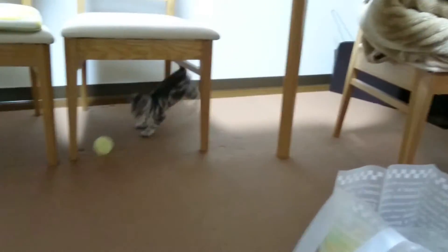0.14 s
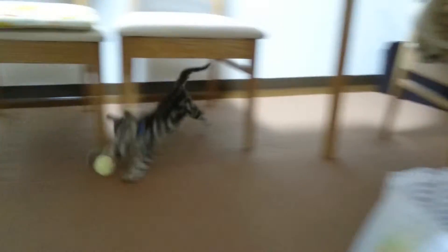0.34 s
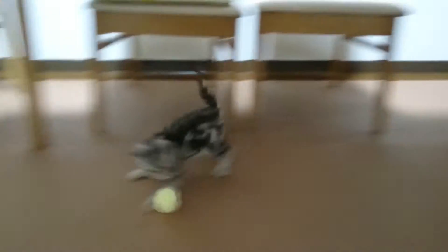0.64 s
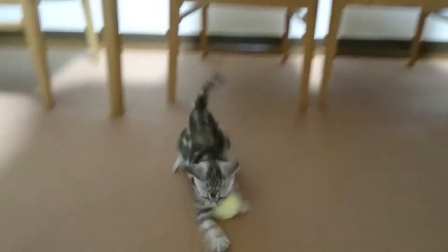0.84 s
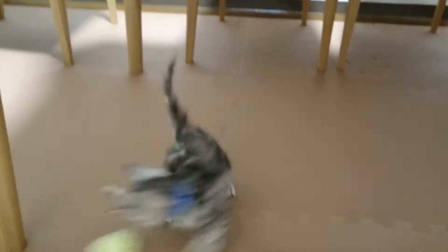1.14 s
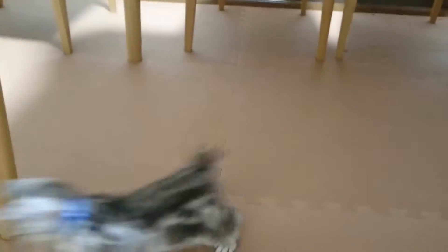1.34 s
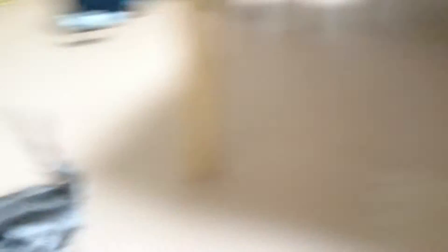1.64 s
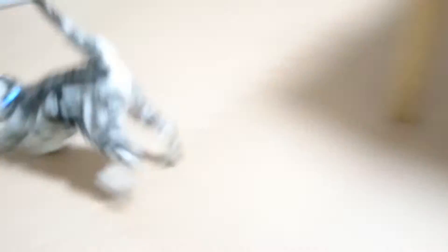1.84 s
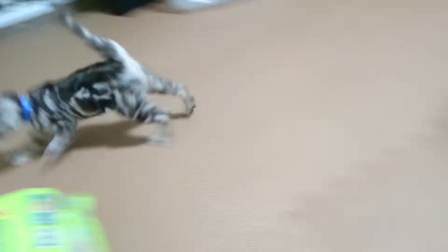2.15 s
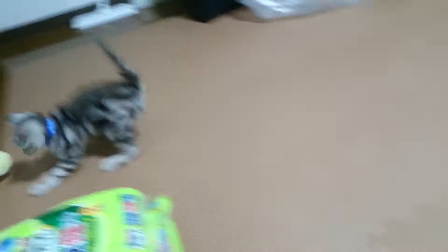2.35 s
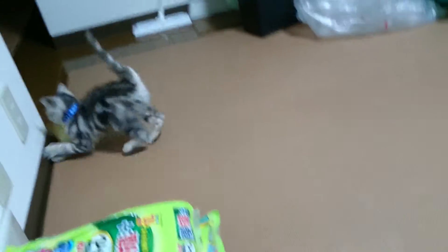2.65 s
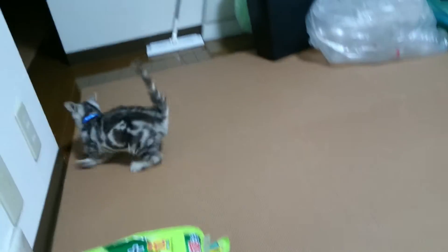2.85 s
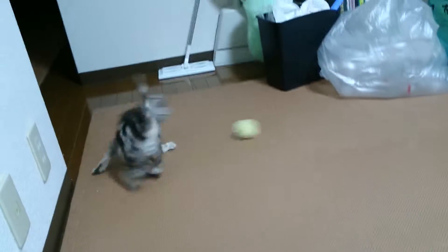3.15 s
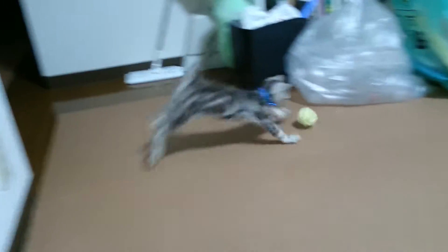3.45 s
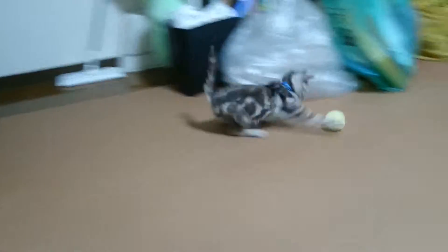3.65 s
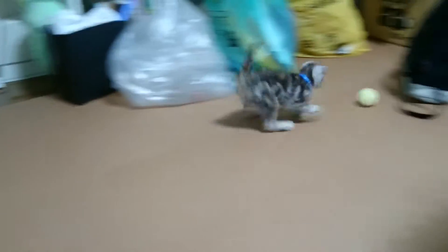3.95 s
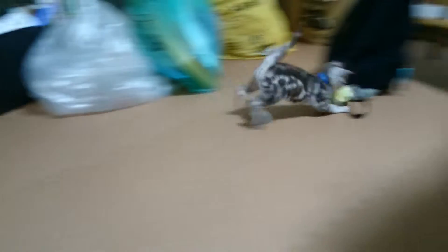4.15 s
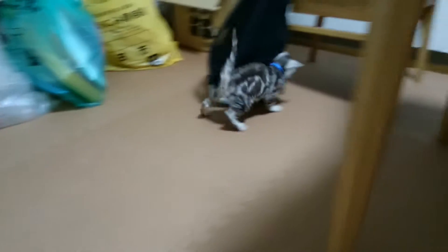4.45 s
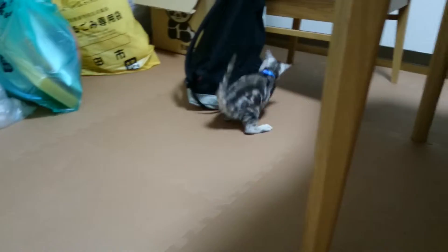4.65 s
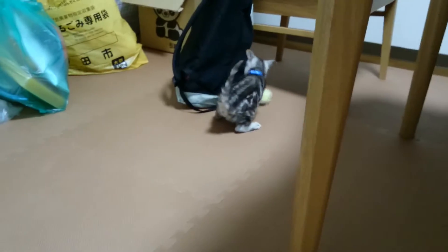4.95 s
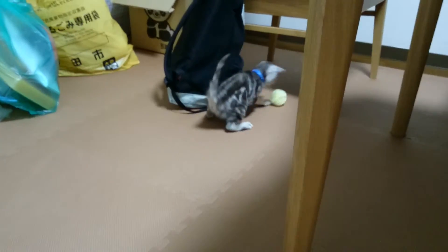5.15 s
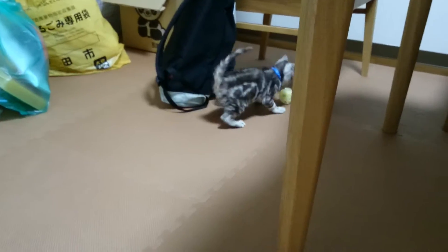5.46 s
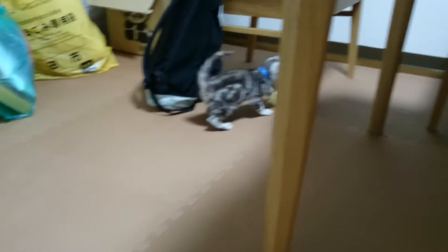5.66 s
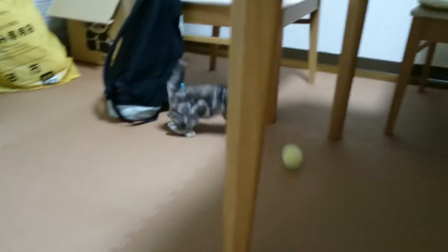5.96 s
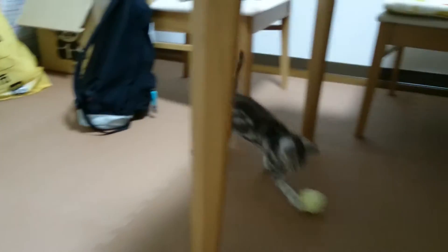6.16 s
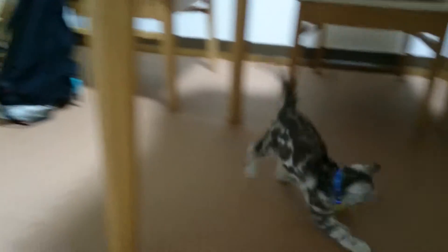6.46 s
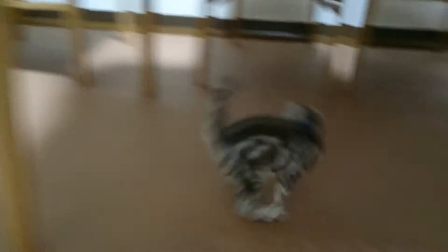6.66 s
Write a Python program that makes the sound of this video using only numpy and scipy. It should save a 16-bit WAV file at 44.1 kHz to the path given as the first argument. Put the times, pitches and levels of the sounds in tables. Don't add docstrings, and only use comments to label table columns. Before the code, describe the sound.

A kitten with a jingling collar bell scampers on a foam mat, batting a crinkly ball with scuffs, claw ticks and soft thumps.

```python
import sys
import numpy as np
from scipy import signal
from scipy.fft import rfft, irfft
from scipy.io import wavfile
from scipy.ndimage import uniform_filter1d

SR = 44100
rng = np.random.default_rng(int(sys.argv[2]) if len(sys.argv) > 2 else 0)


def ratio_of_db(decibels):
    return 10 ** (np.asarray(decibels, float) / 20)


def unload_audio(sound):
    columns = np.transpose(np.atleast_2d(sound))
    steps = np.round(np.clip(columns, -1, 1) * 32767)
    wavfile.write(sys.argv[1], SR, steps.astype(np.int16))


N = 300762

# frequency in Hz, density in dB per Hz.
HUSH_COLOUR = [(25, -14), (42, -13), (62, -3), (100, -3), (220, -8.5), (550, -13.5), (1500, -9.5),
               (4000, -7), (8300, -13), (9300, -16.5), (13000, -29), (16000, -29)]
# start in seconds, level in dB, mat pitch in Hz.
LANDINGS = [(0.007, -45.5, 102), (0.173, -58, 77.5), (0.291, -47.5, 106), (0.424, -44.5, 74),
            (0.592, -37.5, 75), (0.834, -42.5, 83), (0.904, -50, 78.5), (1.116, -42, 72.5),
            (1.35, -40.5, 85), (1.465, -50.5, 83.4), (1.578, -45, 72), (1.681, -40, 86), (1.73, -47, 92),
            (1.848, -49, 74.5), (2.055, -40, 94), (2.22, -46.5, 97), (2.355, -54, 109), (2.43, -48, 73),
            (2.555, -54, 75), (2.804, -54.5, 136), (3.33, -57, 79.6), (3.501, -51.5, 84),
            (3.673, -53.5, 84.5), (4.016, -46.5, 89), (4.142, -43.5, 86), (4.295, -43.5, 74.03),
            (4.686, -54, 77.5), (6.07, -58.5, 83), (6.42, -56, 77), (6.68, -52, 73.4)]
# start in seconds, level in dB, centre in Hz.
BUMPS = [
    (0.62, -55, 1400),
    (1.599, -57, 160),
    (1.78, -53, 2100),
    (3.273, -58.5, 1860),
    (4.12, -53.5, 1460),
    (4.486, -58, 990),
    (1.27, -60.5, 180),
    (0.2, -65.5, 350),
    (6.54, -66.5, 510),
    (6.41, -63.5, 1200),
]
# start in seconds, level in dB.
PAD_PUSHES = [
    (6.025, -65),
    (6.08, -52.5),
    (6.146, -63),
    (6.164, -63),
    (6.458, -62),
    (6.685, -52.5),
    (1.599, -46),
    (2.81, -58.5),
]
# frequency in Hz, level in dB, 60 dB decay in seconds.
PAD_MODES = [(102, -1, 0.074), (192, -2, 0.035), (395, -2, 0.017)]
# start in seconds, level in dB, centre in Hz, drag time in seconds.
SCUFFS = [(0.1387, -44, 2960, 0.045), (0.28, -38, 2820, 0.025), (0.393, -41.5, 3300, 0.26),
          (0.626, -40.5, 1910, 0.1), (0.7944, -47, 2560, 0.16), (0.8781, -38, 1870, 0.087),
          (1.109, -40.5, 3180, 0.078), (1.254, -42.5, 3610, 0.07), (1.335, -38, 2660, 0.1),
          (1.5426, -47, 3670, 0.031), (1.568, -42.5, 3650, 0.14), (1.7184, -56, 3370, 0.065),
          (1.792, -53, 3280, 0.056), (1.8855, -35, 1650, 0.065), (2.0314, -47, 3900, 0.49),
          (2.0713, -42.5, 3560, 0.036), (2.4294, -46, 1990, 0.099), (2.4784, -48.5, 3450, 0.087),
          (2.737, -38.5, 2880, 0.013), (2.804, -43, 3220, 0.14), (3.197, -51.5, 3500, 0.34),
          (3.277, -48.5, 3700, 0.021), (3.505, -50, 3800, 0.57), (3.856, -47.5, 3370, 0.22),
          (4.0152, -40.5, 3080, 0.097), (4.123, -49, 2800, 0.29), (5.748, -51, 3270, 0.11),
          (6.07, -48.5, 2880, 0.066), (6.36, -50.5, 2310, 0.5), (6.532, -44.5, 2020, 0.036)]
# start in seconds, level in dB.
DABS = [
    (0.591, -55),
    (1.676, -48),
    (3.4456, -65),
    (3.667, -50),
    (3.75, -53.5),
    (4.657, -55),
    (1.775, -45),
    (6.131, -56),
    (6.2456, -52.5),
    (6.691, -53),
]
# start in seconds, level in dB, centre in Hz.
CLAW_TAPS = [(0.394, -44, 3700), (0.3982, -39, 3870), (0.626, -36, 2030), (1.2231, -48, 2640),
             (1.255, -49, 3330), (1.3362, -58, 2650), (1.348, -38.5, 2840), (1.5439, -44, 3380),
             (1.7169, -37, 3280), (1.7754, -39, 3100), (1.793, -37.5, 3520), (1.8863, -34.5, 1450),
             (1.8921, -39.5, 3870), (2.3568, -46, 3100), (2.4062, -44.5, 2120), (2.431, -52, 1890),
             (2.7392, -58, 2920), (2.808, -40, 3360), (2.8399, -60, 3150), (3.4456, -46, 3900),
             (4.0166, -40, 3780), (6.0696, -45.5, 2770), (6.4068, -45.5, 2450), (6.5324, -52, 2520)]
# time in seconds, level in dB.
NEARNESS = [(0, -50), (1.0, -53.5), (1.8, -52.5), (2.5, -54), (3.2, -58.5), (3.7, -61.5), (4.3, -53.5),
            (5.3, -57.5), (6.1, -65), (6.82, -54.5)]
# start in seconds, level in dB.
CRACKLES = [(0.1585, -34.5), (0.5511, -29), (0.5945, -25), (0.8083, -28), (0.979, -22), (1.2163, -21),
            (1.455, -33), (1.5606, -31), (1.7584, -44), (1.7933, -28), (2.2, -33.5), (2.3124, -25.5),
            (2.4333, -47), (2.4773, -22.5), (2.561, -52), (2.6073, -24.5), (2.7291, -59), (3.053, -23.5),
            (3.3312, -33), (3.4545, -32), (3.539, -26), (3.729, -31), (3.7915, -38), (3.869, -27),
            (3.989, -27), (4.163, -27), (4.9673, -40), (5.8237, -63), (6.2038, -34), (6.3448, -39)]
# start in seconds, peak in dB.
LONE_SNAPS = [(0.2588, -47.5), (1.442, -41), (1.5606, -35.5), (1.615, -44), (1.7395, -46), (1.7584, -35),
              (2.4333, -36), (2.459, -33), (2.5585, -38), (2.562, -23.5), (2.438, -36), (2.32, -37.5),
              (2.333, -36), (1.182, -39), (1.473, -43), (2.877, -48), (2.601, -39), (2.7296, -41.5),
              (3.138, -43), (3.3315, -35.5), (3.409, -45), (3.4545, -42), (4.5323, -51), (4.9684, -48),
              (5.0552, -50), (5.1188, -50), (5.1951, -53), (5.8245, -37.5), (6.3436, -36), (1.334, -46),
              (6.39, -33.5), (0.355, -42.5), (0.618, -41), (0.648, -36), (1.577, -33), (2.607, -27.5),
              (2.658, -46), (3.42, -47), (3.457, -47), (3.471, -42), (3.487, -41), (3.5565, -32),
              (3.791, -36), (4.8, -57), (5.03, -61), (5.088, -54), (5.105, -53), (5.133, -50), (5.238, -47)]
# start in
# seconds, level in dB.
MORE_SNAPS = [(2.2974, -30), (2.3116, -32), (2.4714, -36), (2.4814, -34), (2.4944, -37), (2.5321, -42),
              (2.5644, -30), (2.5744, -37), (2.6344, -37), (2.6714, -44), (3.9444, -47), (4.1011, -36),
              (5.8374, -43), (6.0576, -36)]
# frequency in Hz, level in dB, 60 dB decay in seconds.
FILM_MODES = [(10020, 8, 0.0038), (11030, 7, 0.0025), (12090, 8, 0.0068), (14400, -47, 0.0013)]
# frequency in Hz, density in dB per Hz.
RUSTLE_COLOUR = [(590, -24), (1000, -28), (2000, -4), (3720, 2), (4330, 4), (4760, -3.5), (6230, -8),
                 (10800, -15), (11900, -14), (13700, -16.5), (15200, -9), (15900, -13.5), (16500, -34)]
# start in seconds, blow in dB, cavity click in dB above the blow.
BLOWS = [(0.0434, -48.5, 17), (0.2589, -27, -1), (0.279, -25, -3.5), (0.3274, -36, -42), (0.416, -34, -14),
         (0.563, -33.5, -2), (0.6314, -36, -19), (0.8797, -28, -7), (1.1766, -39, -26), (1.2136, -31, -11),
         (1.2245, -27.5, -8), (1.229, -31, -14), (1.4558, -32.5, -27), (1.5539, -37, -19),
         (1.5918, -36.5, 0.5), (1.7759, -46, -21), (1.9051, -33, 1.5), (2.0448, -33.5, -19),
         (2.2218, -44, 1.5), (2.4635, -50, -15), (3.1747, -36, -31), (3.4082, -34, -16),
         (3.5452, -26.5, -8.5), (3.5721, -31.5, 8.5), (3.7144, -37.5, 2.5), (3.7489, -38, -13),
         (3.824, -41, 5), (4.152, -29, 0), (4.3928, -25.5, -14), (6.183, -43, 5), (6.23, -37, -15),
         (6.2063, -39, -4), (6.25, -43, -8), (5.908, -63, -10), (6.791, -29, -8)]
# start in seconds, blow in dB.
TOUCHES = [(0.0932, -44), (0.4045, -53), (0.6564, -36.5), (0.85, -36.5), (0.81, -47), (1.13, -41.5),
           (0.9293, -38.5), (1.0375, -42), (1.0999, -39), (1.1922, -34), (1.297, -43.5), (1.4441, -55),
           (1.5223, -44), (1.5354, -40), (1.9759, -41), (2.1819, -41), (2.5044, -40), (3.033, -47.5),
           (3.1911, -36.5), (3.497, -35), (3.505, -43), (3.6691, -46), (3.8051, -41), (4.1355, -52),
           (4.5722, -46.5), (5.0649, -61), (5.1322, -52.5), (5.195, -53), (5.268, -51.5), (5.4226, -60),
           (5.5493, -66), (5.9688, -54), (6.771, -44), (0.275, -34), (0.285, -48), (0.422, -60),
           (0.58, -34), (1.2225, -33), (1.233, -38), (1.243, -43), (2.06, -39), (3.055, -47), (3.1, -45),
           (5.09, -64), (5.27, -59), (1.267, -42), (1.79, -38), (1.863, -34), (2.242, -43), (4.2093, -49),
           (5.49, -67), (6.697, -52)]
# start in seconds, level in dB.
CLACKS = [(0.275, -26), (0.2795, -23), (0.2872, -26), (3.5718, -25), (3.5967, -31), (3.5995, -28),
          (4.152, -21), (4.157, -10.5), (4.2054, -28), (6.0686, -31), (6.079, -37), (6.5528, -26),
          (6.392, -35)]
# start in seconds, level in dB, upper partial in dB above the lower.
RIM_GRAZES = [(0.2623, -38, 0), (0.411, -40, -2), (0.4399, -36.5, -7), (0.5067, -39.5, 0), (0.5634, -37, 0),
              (0.5945, -34, -3), (0.6314, -43, 0), (0.8106, -49, -2), (0.8734, -53, 0), (0.9797, -38, -2),
              (1.1184, -43, 3), (1.2151, -30, 0), (1.2361, -28.5, 0), (1.2494, -42, 4), (1.4554, -42, -2),
              (1.5404, -41, -2), (1.5618, -34, 7), (1.6147, -45, 5), (1.7389, -38, 0), (1.7943, -39, 4),
              (1.8394, -39.5, -3), (2.0223, -47, 5), (2.1999, -43, -3), (2.2263, -37, -2), (2.4803, -39, 2),
              (2.6065, -43, 0), (2.6579, -53, 0), (2.7906, -41, -15), (3.051, -43, 3), (3.1966, -47, -5),
              (3.267, -42, 0), (3.3613, -41, 2), (3.4087, -50, -2), (3.4535, -37, 0), (3.5394, -42, -4),
              (3.5553, -26.5, -1), (3.6194, -50, 0), (3.7155, -34, 10), (3.7469, -35, -2), (3.7908, -47, 5),
              (3.8397, -45, 4), (3.8686, -45, 0), (3.9898, -49, 5), (4.114, -45, 0), (4.1614, -28, 2),
              (4.1944, -46, 0), (4.2901, -45, 0), (4.338, -39, 0), (4.3934, -34.5, 7), (4.5744, -46, -4),
              (4.9671, -45, 0), (5.0549, -51, -14), (5.1322, -47, 0), (5.2375, -54, 0), (5.2629, -52, -3),
              (6.0586, -47, 2), (6.1843, -51, 0), (6.2028, -34.5, 9), (6.3435, -49, -1), (6.79, -43, 3)]
# frequency in Hz, level in dB, 60 dB decay in seconds.
SHELL_LOW = [(4900, 0, .07), (4925, -15, .22), (4860, -8, .06), (5080, -7, .03), (5360, -7, .035)]
# frequency in Hz, level in dB, 60 dB decay in seconds.
SHELL_MID = [(5770, -4, .04), (5910, 0, .06)]
# frequency in Hz, level in dB, 60 dB decay in seconds.
CAVITY = [(5400, -5, .004), (6200, 0, .005), (6800, -9, .003)]
# start in seconds, length in seconds, pellet rolling in dB, ball rustle in dB.
BOUNDS = [(0, 0.027, -48, -54.5), (0.126, 0.011, -51.5, -51.5), (0.259, 0.019, -48, -52),
          (0.411, 0.077, -47.5, -48), (0.579, 0.072, -45.5, -45.5), (0.803, 0.36, -49, -50.5),
          (1.234, 0.034, -54, -51), (1.339, 0.0054, -48.5, -51.5), (1.542, 0.32, -46.5, -50),
          (1.79, 0.13, -47, -62), (2.044, 0.041, -44.5, -45.5), (2.18, 0.24, -54.5, -54),
          (2.343, 0.3, -51, -55), (2.735, 0.14, -58, -56), (3.028, 0.11, -59.5, -55.5),
          (3.17, 0.17, -55, -55), (3.522, 0.089, -46.5, -50.5), (3.647, .25, -44.5, -52),
          (3.942, 0.13, -52, -55), (4.127, 0.11, -44.5, -52.5), (4.212, 0.13, -41.5, -47.5),
          (4.654, 0.028, -54.5, -54.5), (4.964, 0.3, -81, -63), (5.35, 0.11, -67.5, -75),
          (5.748, 0.58, -69, -62.5), (6.073, 0.015, -52, -57), (6.184, 0.09, -49.5, -56),
          (6.357, 0.053, -49, -50), (6.533, 0.051, -57, -60), (6.694, 0.27, -53.5, -59),
          (0.3, 0.098, -57.5, -58), (1.455, 0.09, -54.5, -58), (1.93, 0.11, -50.5, -58),
          (3.412, 0.1, -57, -60.5), (5.497, 0.1, -84, -80), (2.625, 0.02, -55.5, -56),
          (5.747, 0.016, -64, -61)]
# time in seconds, left minus right in dB.
SIDEWAYS = [(0.0, -2.5), (0.32, -0.5), (1.99, 0.5), (2.96, -1), (3.02, 1), (3.27, 0), (4.37, -2.5),
            (4.39, 3.5), (4.78, -2.5), (5.11, -2), (6.67, -2.5), (6.82, 0.5)]
# frequency in Hz, level in dB.
PORT_WIDTH = [(25, 7), (60, 15.5), (125, 12.5), (250, 11.5), (500, 10.5), (1000, 0), (15000, 0)]
# frequency in Hz, level in dB.
HOLLOW = [(3750, 0), (4300, -8), (4650, 0)]

HUSH_DB = -69
ROOM_T60_S, TREBLE_T60_S, ROOM_WET_DB = .22, .1, -8
LOWEST_HZ = 52
DAB_HZ, DAB_DRAG_S, TAP_T60_S = 3100, 0.22, .007
FUR_MOST_DB, FUR_FOLLOWS, STIR_MID_DB = -51, 0.67, -47
RIM_HZ, RIM_T60_S = (12100, 12440), .06
TOUCH_CLICK_DB = -7.5
ATTACK_DB_S, RELEASE_DB_S, REST_DB = 907, 137, -94
PELLET_SAG_DB_S, BALL_SAG_DB_S = 19, 1.5
BELL_PAN_DB, RIM_PAN_DB, BALL_PAN_DB, PAWS_PAN_DB = .6, 5.5, 1, 3.5
LEFT_PORT_DB = 1.4
LIMIT = .24
OFFSET = -.0005
TOP_HZ = 15900


def level(x, db):
    return x * ratio_of_db(db) / np.sqrt(np.mean(x ** 2))


def pan(db):
    return ratio_of_db(np.array([db, -db]).reshape(2, -1) / 2)


def band(x, lo_hz, hi_hz):
    return signal.sosfilt(signal.butter(2, [lo_hz, min(hi_hz, .45 * SR)], "bandpass", fs=SR, output="sos"), x)


def colour(x, points):
    hz, db = np.transpose(points)
    f = np.maximum(np.fft.rfftfreq(N, 1 / SR), 1)
    return irfft(rfft(x) * ratio_of_db(np.interp(np.log(f), np.log(hz), db)), N)


def fade(t, t60):
    return np.exp(-np.log(1000) * t / t60)


def ring(x, modes):
    out = 0
    for hz, db, t60 in modes:
        pole = np.exp(2j * np.pi * hz / SR - np.log(1000) / (t60 * SR))
        out = out + ratio_of_db(db) * signal.lfilter([1], [1, -pole], x).imag
    return out


def strikes(s, db, count=1, spread_s=0, fall_db=0, scatter_db=0):
    chance = rng.random((len(s), count, 3))
    after = chance[..., 0] * (np.arange(count) > 0)
    size = ratio_of_db(db[:, None] - fall_db * after - scatter_db * chance[..., 1] * (after > 0))
    at = (SR * (s[:, None] + spread_s * after)).astype(int)
    lag = 1 + (3 * chance[..., 2]).astype(int)
    out = np.zeros((2, N))
    np.add.at(out[0], np.minimum(at, N - 1), size)
    np.add.at(out[1], np.minimum(at + lag, N - 1), size)
    return out


def grains(per_s, spread_db):
    hit = rng.random((2, N)) < per_s / SR
    size = ratio_of_db(spread_db * np.minimum(rng.exponential(size=(2, N)), 3.2))
    return hit * rng.choice([-1, 1], (2, N)) * size


def patchy(per_s, spread_db):
    k = int(SR / per_s)
    held = np.repeat(rng.standard_normal(N // k + 1), k)[:N]
    return ratio_of_db(spread_db * uniform_filter1d(held, k // 2))


def chatter(s, db, t60):
    out = np.zeros(N)
    np.add.at(out, (s * SR).astype(int), ratio_of_db(db))
    return signal.lfilter([1], [1, -fade(1 / SR, t60)], out)


def bounds(now, levels_db, sag_db_s):
    s, length = np.transpose(BOUNDS)[:2, :, None]
    age = now - s
    db = levels_db[:, None] - ATTACK_DB_S * np.maximum(-age, 0) - sag_db_s * np.clip(age, 0, length)
    db = db - RELEASE_DB_S * np.maximum(age - length, 0)
    return np.maximum(db.max(axis=0), REST_DB)


def hush():
    return level(colour(rng.standard_normal((2, N)), HUSH_COLOUR), HUSH_DB)


def room(x):
    t = np.arange(SR // 3) / SR
    hop = SR // 6
    out = np.zeros((2, N + 2 * SR))
    for i in range(-hop, N, hop):
        body, treble = rng.standard_normal((2, 2, len(t))) * (t > .003)
        tail = band(body, 60, 13000) * fade(t, ROOM_T60_S)
        tail = tail + band(treble, 12000, 21000) * fade(t, TREBLE_T60_S)
        tail = tail * ratio_of_db(ROOM_WET_DB) / np.sqrt(np.sum(tail ** 2, axis=1, keepdims=True))
        at = np.arange(max(i, 0), min(i + 2 * hop, N))
        window = np.sin(np.pi * (at - i) / (2 * hop))
        wet = signal.fftconvolve(x[:, at] * window, tail, axes=1)
        out[:, at[0]:at[0] + wet.shape[1]] += wet
    return out[:, :N]


def thuds(events, rise_s, t60):
    out = np.zeros((2, N))
    t = np.arange(SR // 3) / SR
    shape = (1 - np.exp(-t / rise_s)) * fade(t, t60)
    for s, db, hz in events:
        shake = rng.standard_normal((2, 2 * len(t)))
        mat = band(band(shake, hz / 2.0, hz * 1.446), 60.0, 3000)
        mat = mat + ratio_of_db(-19) * band(band(shake, 40, 460), 46, 1270)
        mat = band(mat, LOWEST_HZ, 6000)[:, len(t):] * shape
        i = max(int((s - rise_s) * SR), 0)
        out[:, i:i + len(t)] += level(mat, db - 18.0)[:, :N - i]
    return out


def pads():
    push = strikes(*np.transpose(PAD_PUSHES))[0]
    return ring(uniform_filter1d(push, size=60), PAD_MODES)


def paws(fur_db):
    slip = level(grains(4000, 2.3) * patchy(60, 2.94), 0)
    out = level(band(slip[:, ::-1], 1100, 4400), -4) * ratio_of_db(np.minimum(fur_db, FUR_MOST_DB))
    wide = colour(slip, RUSTLE_COLOUR) + ratio_of_db(-14.5) * band(slip, 480, 1670)
    t = np.arange(SR // 3) / SR
    for s, db, hz, drag_s in SCUFFS + [(*row, DAB_HZ, DAB_DRAG_S) for row in DABS]:
        i = int(s * SR)
        part = slip[:, i:i + len(t)]
        shape = (1 - np.exp(-t / 0.0046)) * fade(t, np.clip(2.71 * drag_s, .01, 1))
        shape = shape + ratio_of_db(-1.0) * np.exp(-((t - .004) / 0.0037) ** 2)
        scuff = level(band(part, hz / 1.66, hz * 1.46), -11.5) + level(wide[:, i:i + len(t)], -5)
        out[:, i:i + len(t)] += ratio_of_db(db - 2.0) * scuff * shape[:part.shape[1]]
    return out


def claws():
    out = np.zeros((2, N))
    s, db, hz = np.transpose(CLAW_TAPS)
    ticks = strikes(s, db - 1, count=6, spread_s=.012, fall_db=8, scatter_db=8)
    for i, f in zip((s * SR).astype(int), hz):
        modes = [(f, 0, TAP_T60_S), (1.3 * f, -5, TAP_T60_S), (0.7 * f, -5, TAP_T60_S)]
        out[:, i:i + 2000] += ring(ticks[:, i:i + 2000], modes)
    return band(out, 1510, 6100)


def ball(rustle_db):
    s, db = np.transpose(CRACKLES)
    ticks = strikes(s, db - 11, count=7, spread_s=.05, fall_db=10, scatter_db=12)
    single = LONE_SNAPS + [(at, peak_db - 12) for at, peak_db in MORE_SNAPS]
    ticks = ticks + strikes(*np.transpose(single), count=4, spread_s=.004, fall_db=6, scatter_db=8)
    snaps = ratio_of_db(-2.5) * ring(ticks, FILM_MODES)
    rubbing = colour(grains(5000, 2.5) * patchy(70, 3), RUSTLE_COLOUR)
    rustle = level(band(rubbing, 8200, 19000), 1.5)
    rustling = ratio_of_db(rustle_db) + chatter(s, db - 27.5, 0.14)
    return band(band(snaps, 9700, 17000), 9600, 23000) + rustle * rustling


def rim(rolling, rattle_db):
    s, db, upper_db = np.transpose(RIM_GRAZES)
    out = 0
    for hz, side in zip(RIM_HZ, (-1, 1)):
        grazes = strikes(s, db - 7 + side * upper_db / 2, count=4, spread_s=.03, fall_db=8, scatter_db=5)
        out = out + ring(grazes, [(hz, 0, RIM_T60_S)])
    rolled = ring(rolling, [(hz, 0, RIM_T60_S) for hz in RIM_HZ])
    out = out + level(rolled, -16.0) * ratio_of_db(rattle_db)
    return band(out, 11300, 13200) * pan(RIM_PAN_DB)


def bell(rattle_db):
    s, db, click_db = np.transpose(BLOWS + [(*row, TOUCH_CLICK_DB) for row in TOUCHES])
    click_db = db + click_db
    low = ring(strikes(s, db - 3, count=6, spread_s=.03, fall_db=8, scatter_db=9), SHELL_LOW)
    mid = ring(strikes(s, click_db - 5, count=5, spread_s=.035, fall_db=9, scatter_db=6), SHELL_MID)
    click = ring(strikes(s, click_db + 1, count=5, spread_s=.02, fall_db=6, scatter_db=6), CAVITY)
    clack = ring(strikes(*np.transpose(CLACKS)), CAVITY)
    rolling = grains(130, 8.1)
    shell = level(ring(rolling, SHELL_LOW), -11.5) * ratio_of_db(rattle_db)
    rattle = level(ring(grains(2100, 3.6), CAVITY) * patchy(70, 3.17), 0.26)
    rattling = ratio_of_db(rattle_db) + chatter(s, click_db - 8.5, 0.027)
    steep = signal.cheby1(5, 1, [4790, 7400], "bandpass", fs=SR, output="sos")
    body = signal.sosfilt(steep, low + mid + click + clack + shell + rattle * rattling)
    return body + rim(rolling, rattle_db)


def scene():
    now = np.arange(N) / SR
    pellet_db, film_db = np.transpose(BOUNDS)[2:]
    rattle_db = bounds(now, pellet_db, PELLET_SAG_DB_S)
    rustle_db = bounds(now, film_db, BALL_SAG_DB_S)
    stir_db = (rattle_db + rustle_db) / 2 - STIR_MID_DB
    fur_db = np.interp(now, *np.transpose(NEARNESS)) + FUR_FOLLOWS * stir_db
    kitten = (paws(fur_db) + claws()) * pan(PAWS_PAN_DB)
    kitten = kitten + ball(rustle_db) * pan(BALL_PAN_DB) + bell(rattle_db) * pan(BELL_PAN_DB)
    kitten = kitten * pan(np.interp(now, *np.transpose(SIDEWAYS)) - LEFT_PORT_DB)
    bumps = np.sum(thuds(BUMPS, 0.0032, 0.36), axis=0)
    mat = ratio_of_db(-3.0) * thuds(LANDINGS, .018, 1.0) + bumps + pads()
    return hush() + room(kitten) + mat + kitten


def ports(left_right):
    mid = np.mean(left_right, axis=0)
    side = colour(left_right[0] - mid, PORT_WIDTH)
    return np.array([mid + side, mid - side]) * pan(LEFT_PORT_DB)


def band_limit(x):
    return signal.sosfilt(signal.butter(12, 16940, fs=SR, output="sos"), x)


def record(dry):
    rounded = LIMIT * np.tanh(ports(dry) / LIMIT)
    top = signal.ellip(8, .2, 45, TOP_HZ, fs=SR, output="sos")
    mix = signal.sosfilt(top, colour(rounded, HOLLOW)) + OFFSET
    return band_limit(mix)


dry = scene()
out = record(dry)
unload_audio(out)
```